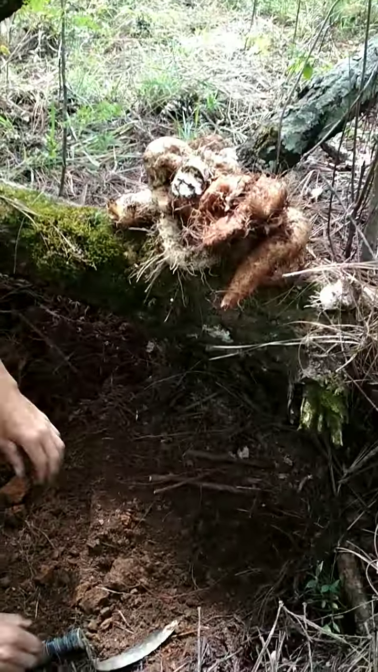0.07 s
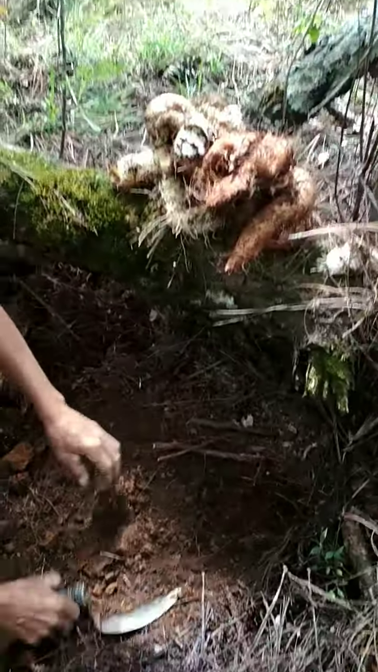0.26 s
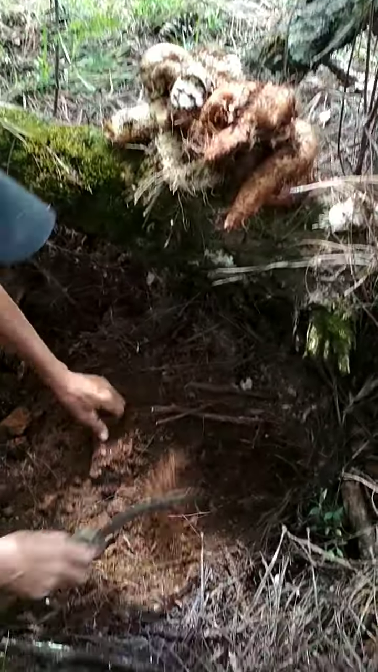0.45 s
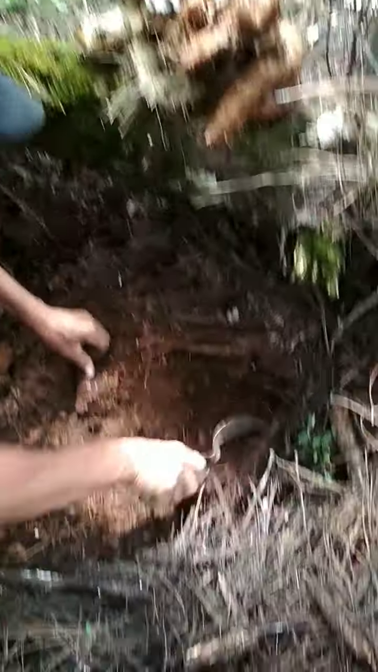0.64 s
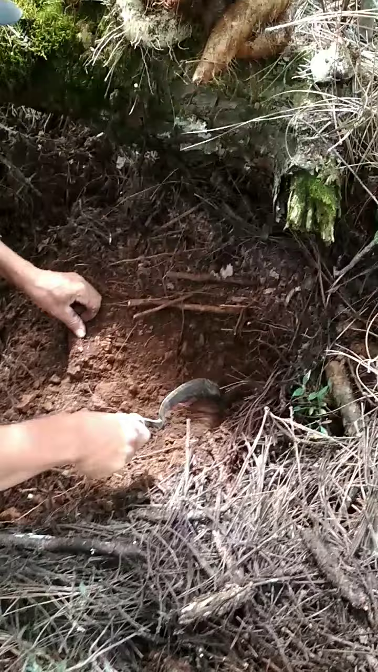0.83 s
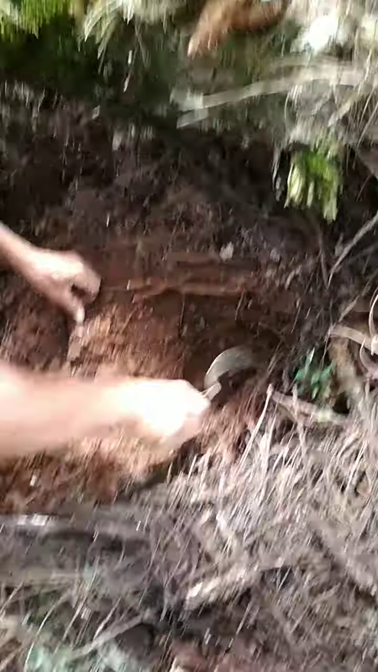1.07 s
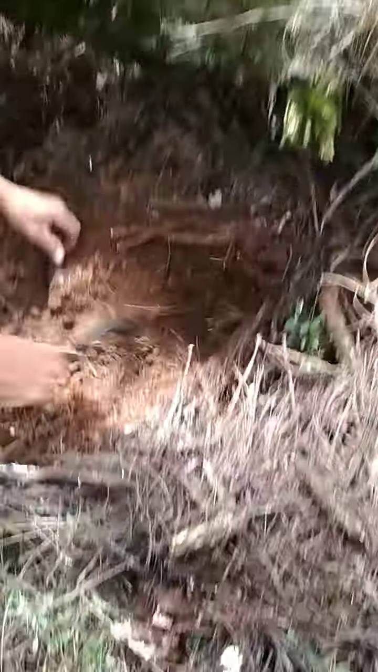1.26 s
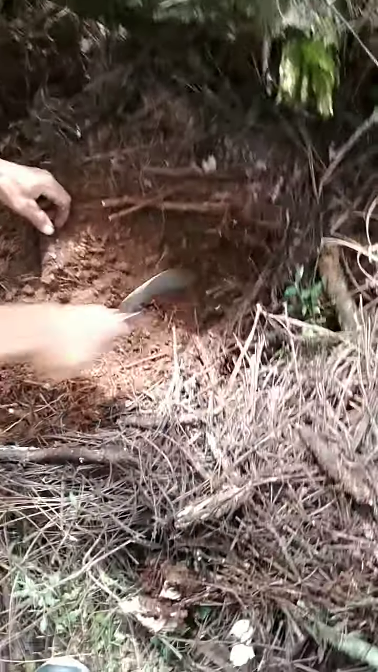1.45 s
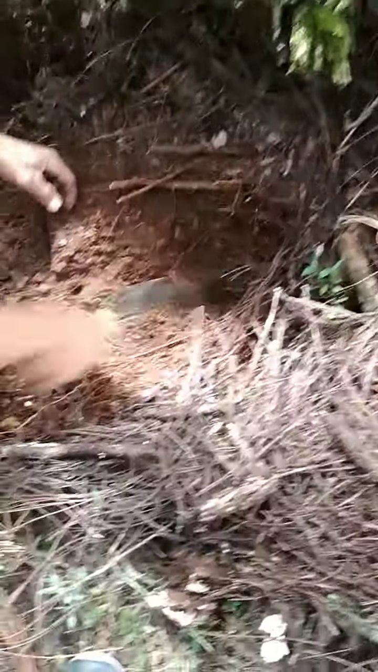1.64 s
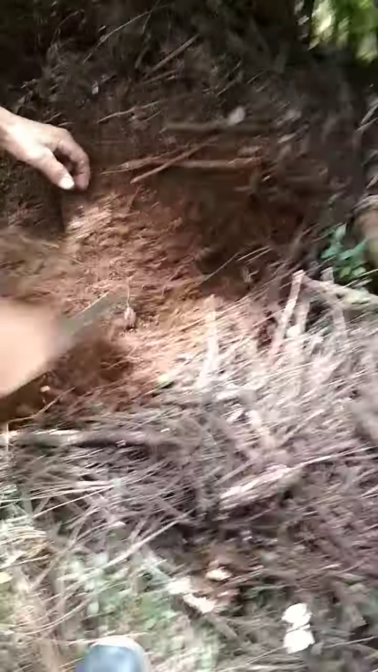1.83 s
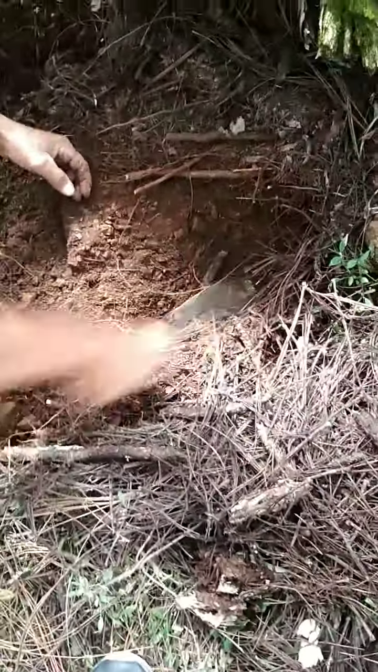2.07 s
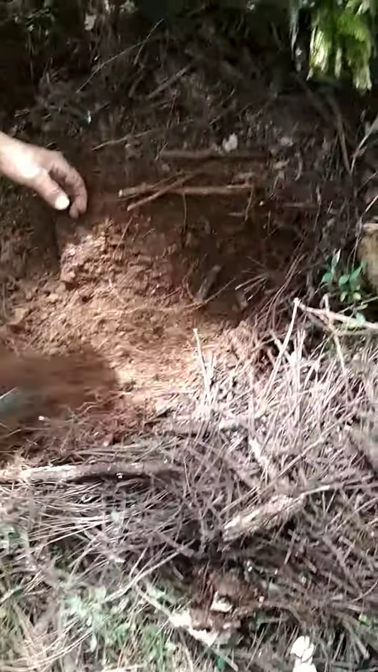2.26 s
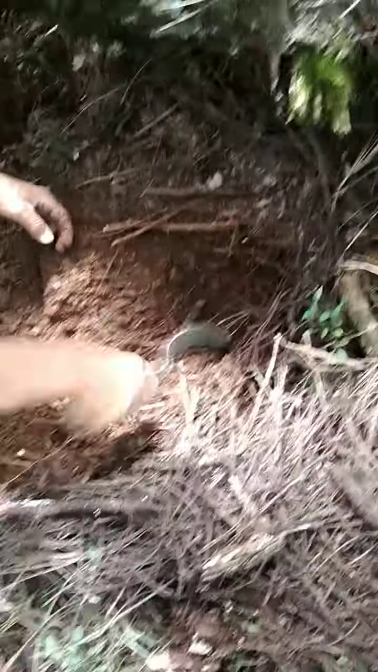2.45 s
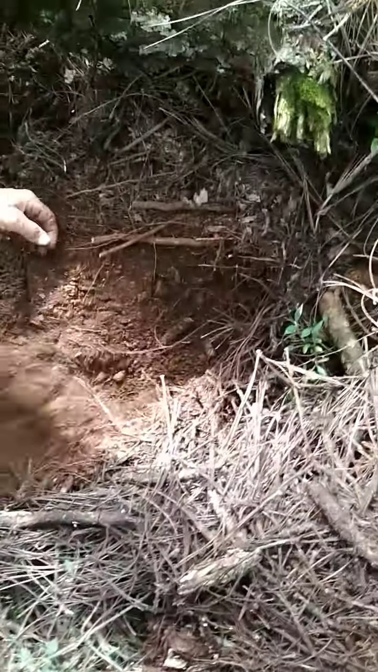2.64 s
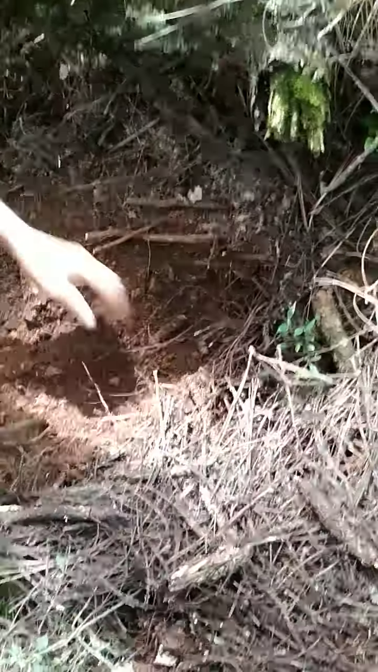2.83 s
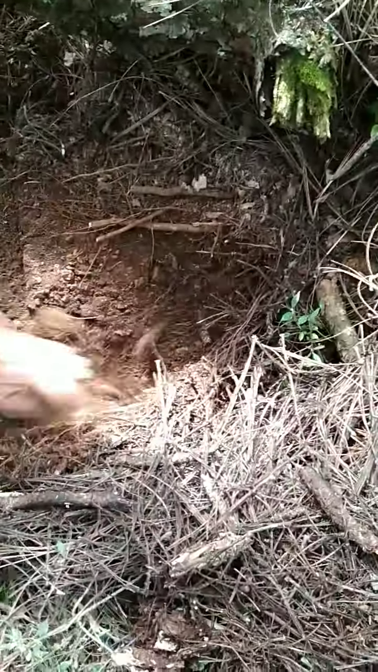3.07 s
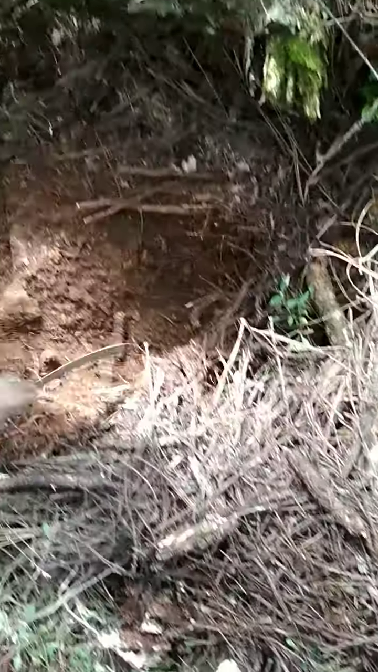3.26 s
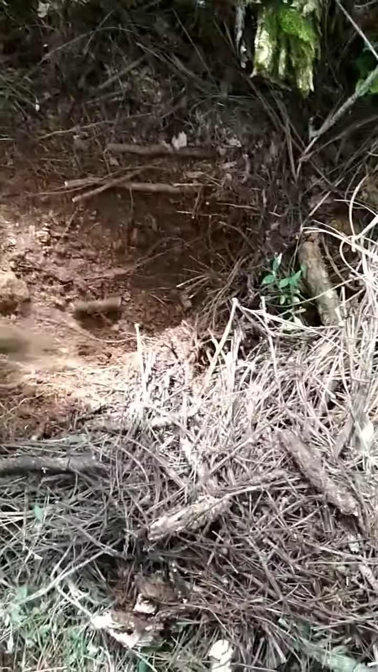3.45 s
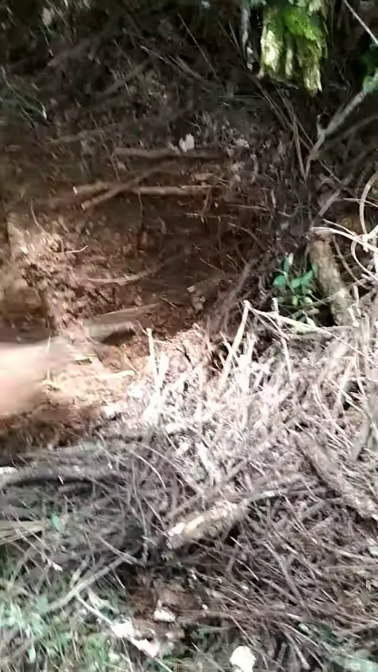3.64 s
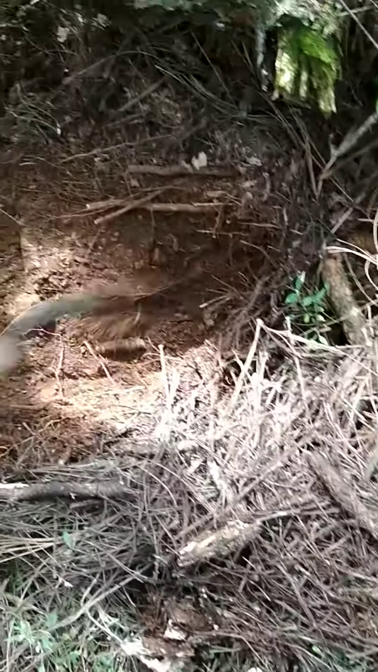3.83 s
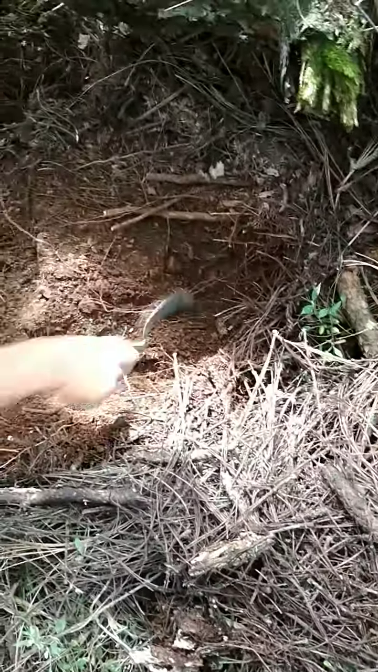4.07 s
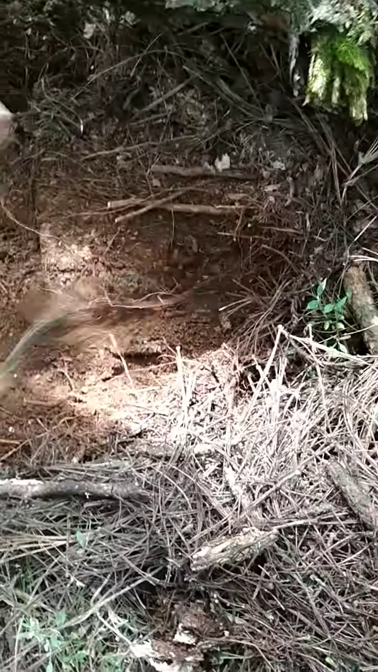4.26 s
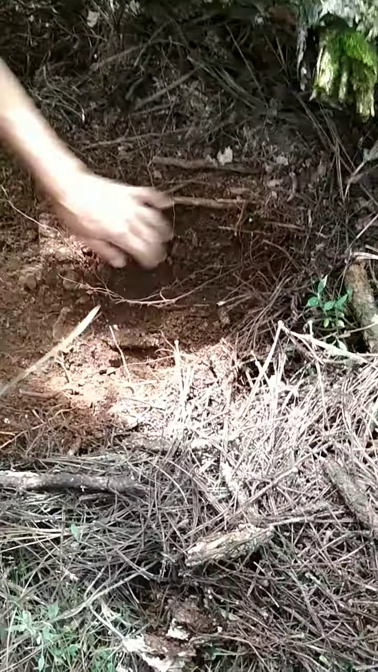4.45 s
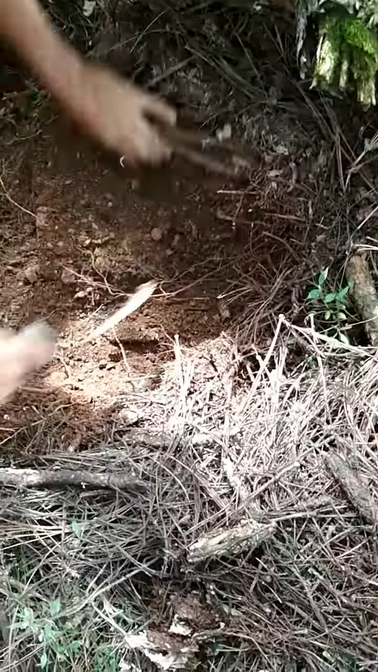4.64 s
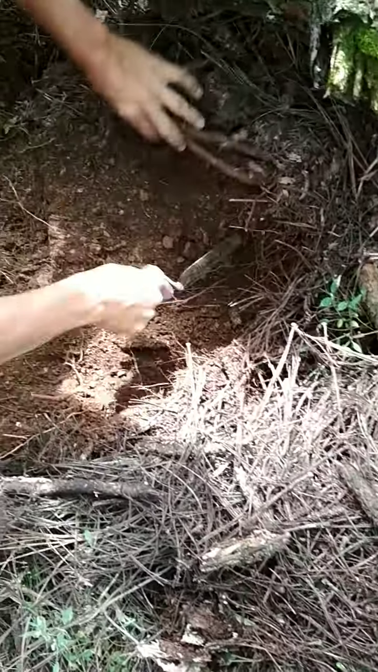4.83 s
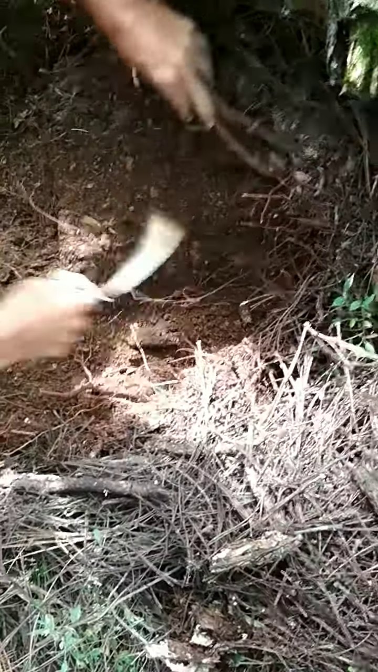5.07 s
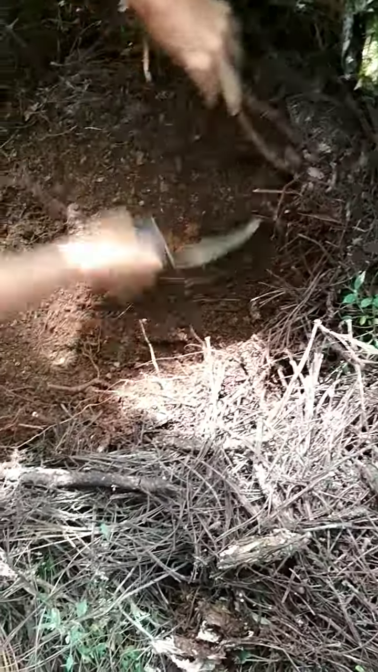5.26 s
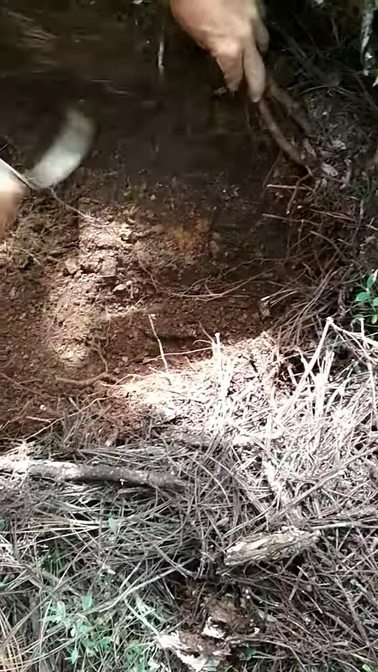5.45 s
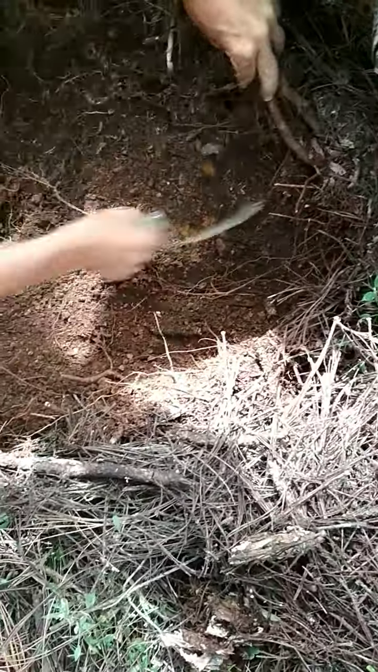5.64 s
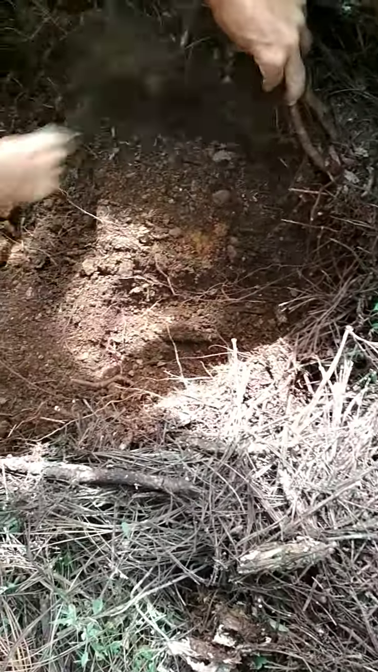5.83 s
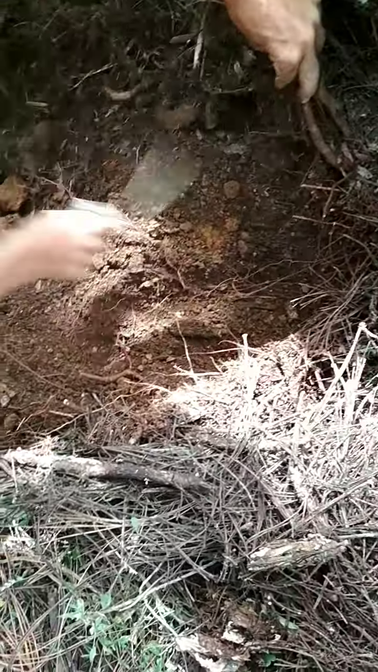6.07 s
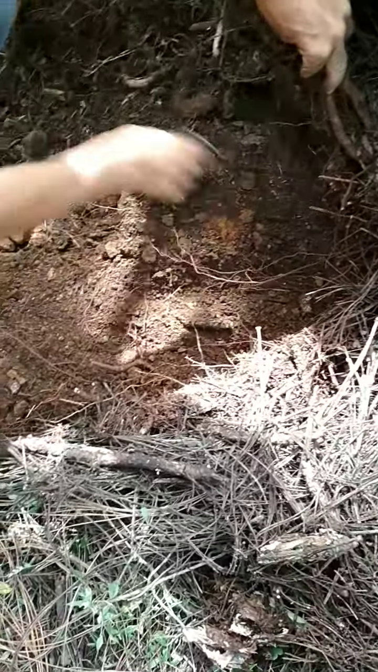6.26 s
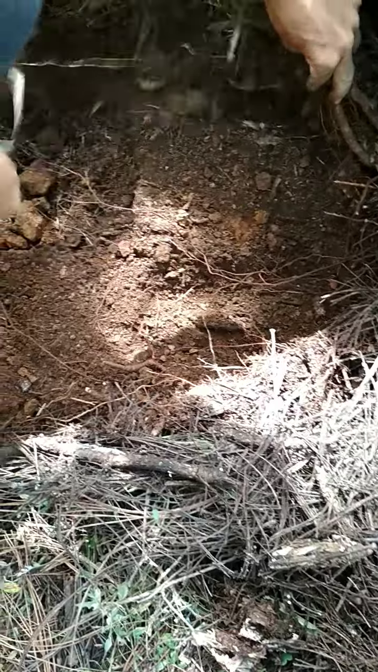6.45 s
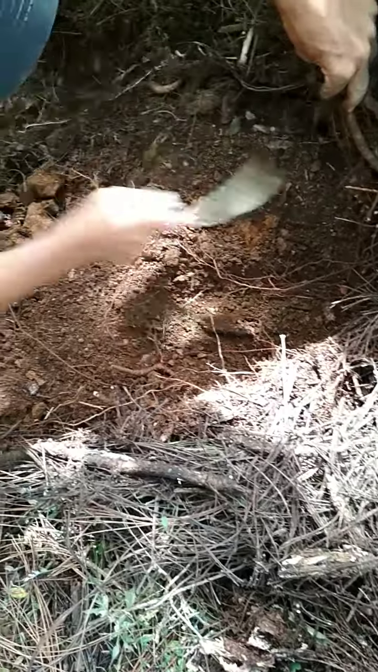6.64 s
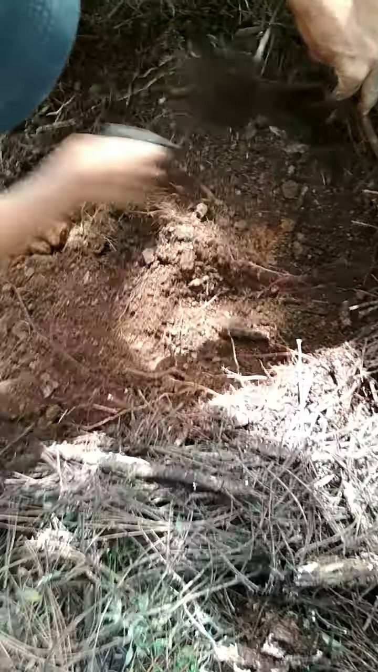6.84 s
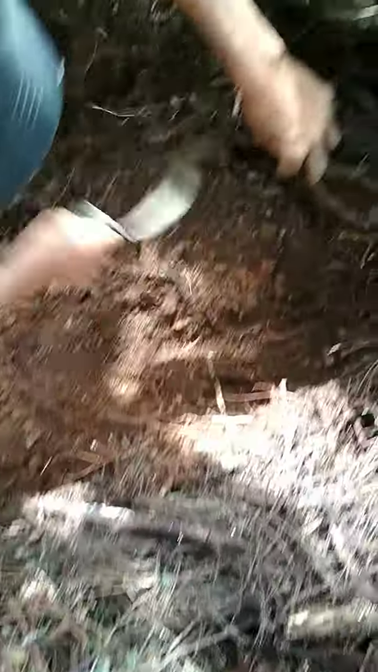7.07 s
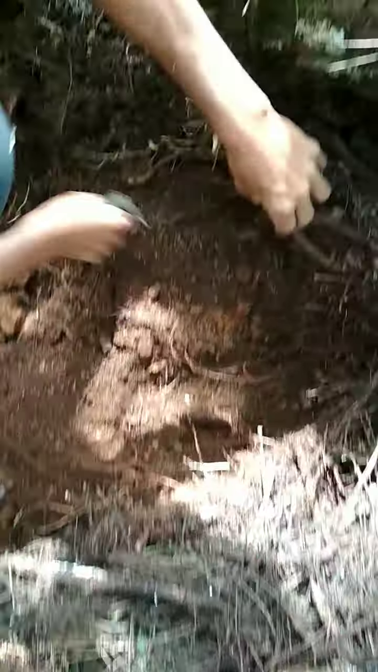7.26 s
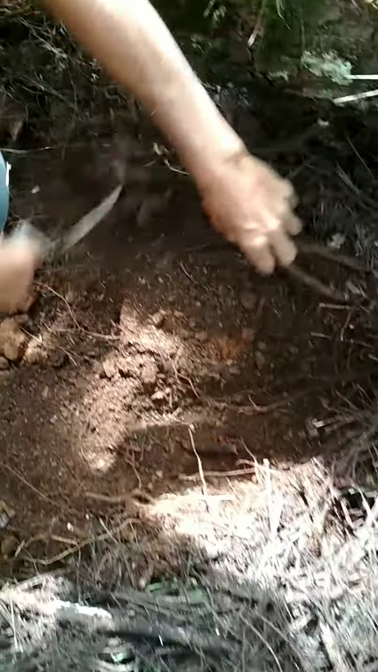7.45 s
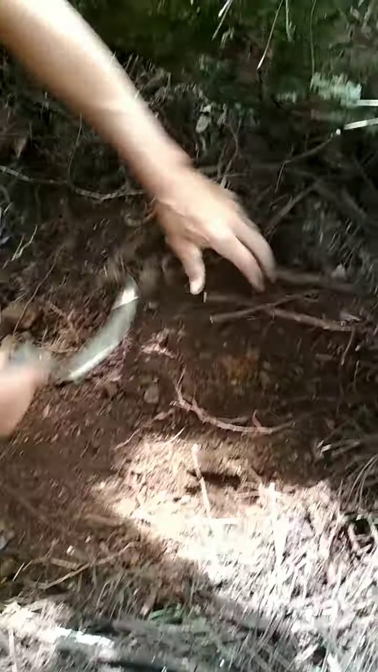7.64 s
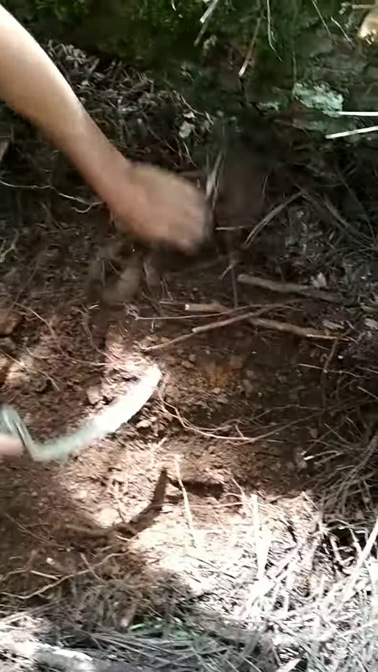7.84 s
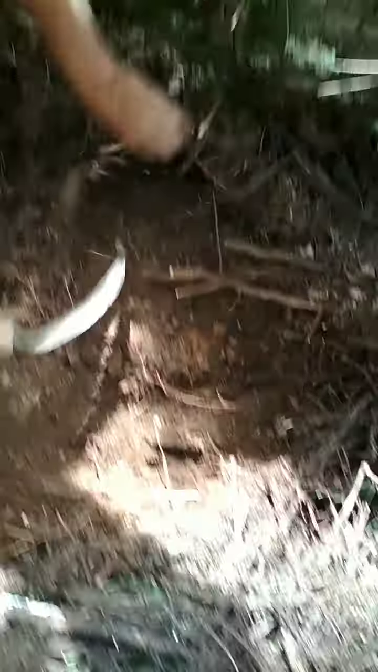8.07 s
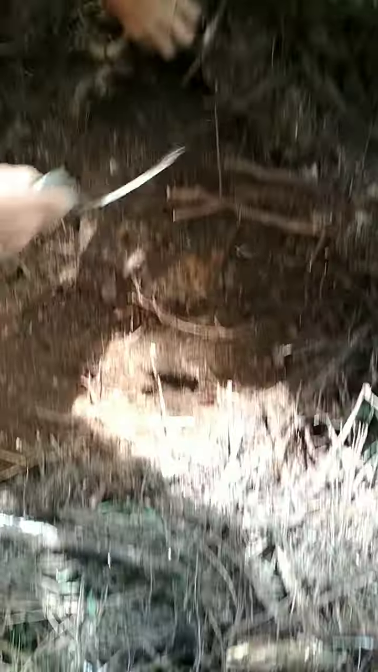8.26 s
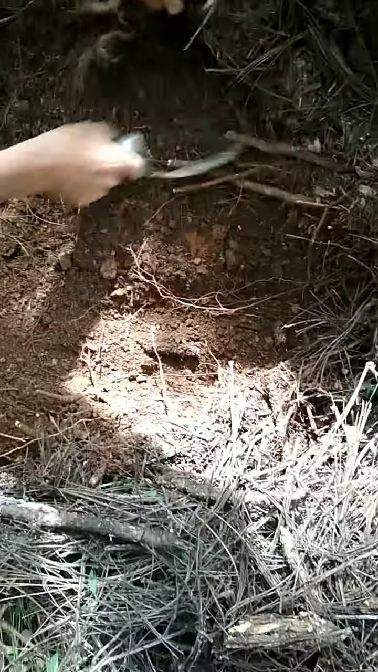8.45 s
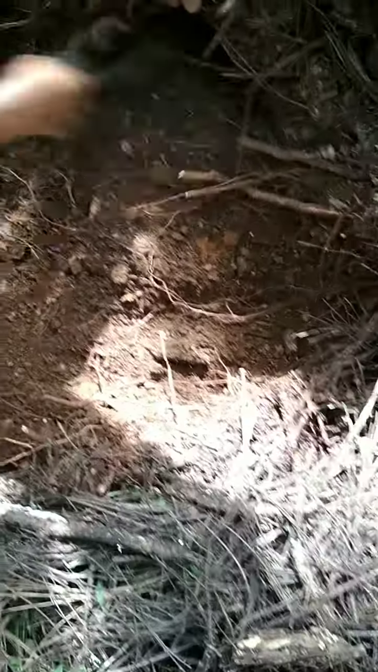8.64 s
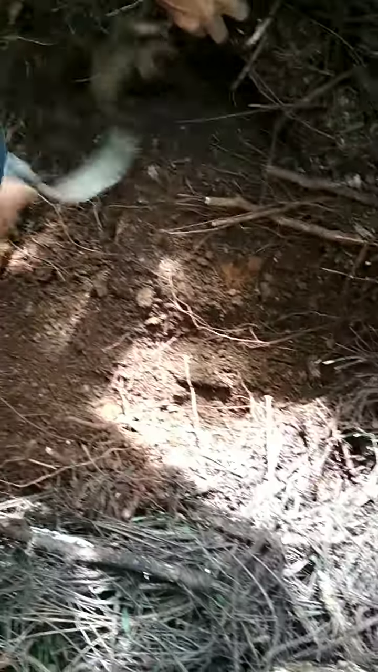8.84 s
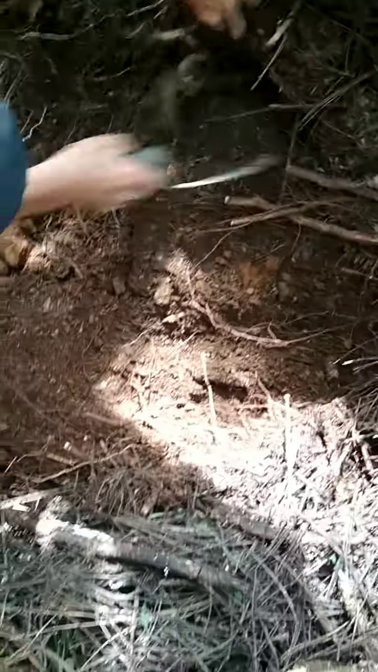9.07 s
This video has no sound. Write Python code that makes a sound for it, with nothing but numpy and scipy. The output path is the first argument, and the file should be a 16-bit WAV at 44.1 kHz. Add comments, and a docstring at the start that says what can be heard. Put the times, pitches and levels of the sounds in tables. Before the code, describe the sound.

Quiet woodland, with very faint tree hush, low rumble and a thin electronic whine. Light ticks and a small crack at 0.3-0.5 s, then a curved blade bites dry soil at 0.9 s and harder at 1.2-1.3 s, a bright gritty crunch with a dull thump. Rakes and chops follow at 1.7 and 2.0-2.7 s, ending in sharp cracks. A softer lull of brushing earth lasts to 3.4 s, then dense, strong crunching strokes at 3.4-3.6, 3.9 and 4.2-4.4 s. Gentle crumbling follows, with separate chops around 5.0, 5.4 and 5.8 s and tiny pebble pings on steel. The fullest dig comes at 6.3-6.5 s with a low shudder, another at 6.9 s. Light scraping and trickling crumbs fill 7-8.4 s, with a brief snap near 7.95. A last knocking scrape lands at 8.5-8.75 s, then crumbs settle until about 9.1 s. Close, dry, drifting right.

```python
"""A low rumble, the hush of the trees and the thin whine of a phone's electronics are heard first.
Then a curved steel blade chops and rakes dry, stony soil and twigs on a wooded slope, close by.
Filtered grains make the clumped crunch of grit and earth; damped sine pushes thump the ground.
Resonances set the steel singing faintly under the grit, and pebbles make it ring.
Crumbs trickle between strokes, and the slope scatters a short echo."""
import sys
import numpy as np
from scipy import signal
from scipy.fft import rfft, irfft, next_fast_len
from scipy.io import wavfile
from scipy.ndimage import uniform_filter1d, map_coordinates

SR = 44100
rng = np.random.default_rng(int(sys.argv[2]) if len(sys.argv) > 2 else 0)


def unload_wav(signal):
    """Save mono or channel-first audio to the path in sys.argv[1] as 16-bit WAV at rate SR, clipped to [-1, 1]."""
    wavfile.write(
        sys.argv[1],
        SR,
        np.round(np.clip(np.atleast_2d(signal).T, -1, 1) * 32767).astype(np.int16),
    )


N = 401310

# All levels below are relative: the functions trim them into the mix.
# Low rumble over time: (time [s], level [dB])
RUMBLE_LEVEL = [(0, -79.5), (6.24, -81), (6.33, -57.5), (6.4, -56), (6.51, -65), (7.0, -67.5), (7.88, -81),
                (8.01, -64.5), (8.51, -68.5), (8.59, -58), (9.1, -76)]
# Colour of the rumble: (frequency [Hz], density [dB per Hz])
RUMBLE_COLOUR = [(12, -41), (20, -7), (48, -8), (82, -2), (138, -12), (188, -25.5), (260, -46),
                 (340, -69.5), (570, -120)]
# Colour of the still forest: (frequency [Hz], density [dB per Hz])
FOREST_COLOUR = [(150, -6), (350, -2.5), (1000, -20), (1700, 4), (2600, -22), (6000, -23.5), (11000, -17.5),
                 (16000, -45)]
# Whine of the electronics, before the gain of each port: (frequency [Hz], level [dB])
WHINE_TONES = [(8000, -92.5), (9000, -99), (10000, -96), (12000, -99), (13000, -92), (14000, -111.5)]
# Port colour, left minus right: (frequency [Hz], difference [dB])
PORT_COLOUR = [(200, 0), (1500, -1), (4000, -0.5), (9000, -8), (14000, 2)]
# Phase by which the left port leads: (frequency [Hz], lead [rad])
PORT_PHASE_LEAD = [(250, -0.3), (900, -0.48), (1500, -0.62), (2600, 0.9)]
# Where the work lies as the phone turns: (time [s], left lag [s], left minus right [dB])
WORK_DIRECTION = [(0, 0.00003, 0.5), (1.8, .000035, -4), (2.9, 0.000054, -0.5), (4.5, 0.000035, -3),
                  (5.2, 0.00013, -4.5), (6.3, 0.00014, -5), (7, 0.00015, -5.5), (9.1, 0.00025, -6)]
# Crumbs and needles settling between strokes: (time [s], grit level [dB], earth level [dB])
SETTLING_CRUMBS = [(0, -93, -92), (1.1, -81, -74.5), (1.45, -70, -88), (1.95, -72.5, -80),
                   (2.35, -58.5, -68), (2.55, -74, -72), (3.05, -86, -81), (3.15, -69.5, -74.5),
                   (3.7, -81, -78), (4.65, -64, -69.5), (4.76, -74, -92), (4.85, -79, -108),
                   (5.25, -62.5, -63.5), (6.0, -71.5, -90.5), (6.75, -74, -76), (7.1, -65.5, -67),
                   (7.87, -102.5, -96), (7.99, -60, -78), (8.5, -71.5, -95), (8.8, -60.5, -59.5),
                   (9.02, -80, -89.5), (9.1, -70.5, -67.5)]
# Pushes and drags of blade or hand through soil: (full force [s], rise [s], hold [s], fall [s],
# grit level [dB], earth level [dB], deep earth level [dB])
SOIL_SCRAPES = [(0.025, .1, 0.034, 0.19, -100, -92.5, -72.5), (.4, 0.02, 0, 0.22, -81, -67, -99),
                (0.447, 0.13, 0.0051, 0.13, -60, -72, -97), (.53, 0.045, 0, 0.096, -67.5, -60, -88),
                (0.74, 0.23, 0.013, 0.06, -67, -75, -93), (0.882, 0.068, 0.0063, 0.046, -43.5, -51.5, -74),
                (0.968, 0.07, 0.012, 0.13, -67, -57.5, -68),
                (1.191, 0.051, 0.0067, 0.032, -48.5, -55.5, -56),
                (1.288, 0.056, 0.00073, 0.1, -31.5, -40.5, -39.5),
                (1.632, 0.08, 0.0036, 0.093, -60, -55.5, -55),
                (1.695, 0.033, 0.017, 0.14, -40.5, -46, -55.5), (1.838, 0.09, 0.015, 0.091, -57, -70, -86),
                (2.0, 0.038, 0.011, 0.15, -61.5, -51.5, -63), (2.08, 0.08, 0.0015, .06, -72, -65, -48.5),
                (2.16, 0.099, .02, 0.067, -35, -45.5, -53), (2.245, 0.072, 0.018, 0.042, -32, -42.5, -46.5),
                (2.429, 0.044, 0, .07, -57, -44, -47), (2.57, 0.32, 0.034, 0.11, -84, -60.5, -53.5),
                (2.66, 0.077, 0.025, 0.076, -32.5, -42, -51.5), (2.859, 0.29, 0, 0.17, -60.5, -61, -66.5),
                (3.01, .03, 0.028, .1, -94, -81, -67), (3.535, 0.17, 0.022, 0.056, -35, -37.5, -41.5),
                (3.67, 0.57, 0, 0.59, -61.5, -53, -57.5), (3.879, 0.063, 0.00095, 0.097, -41.5, -41, -46.5),
                (3.973, 0.11, 0.013, .05, -57, -47, -52.5), (4.08, 0.2, 0, 0.13, -60.5, -64, -77),
                (4.181, 0.022, 0.0073, 0.12, -66, -65, -52.5),
                (4.312, 0.14, 0.019, 0.055, -37.5, -43.5, -53),
                (4.46, 0.14, 0.059, 0.23, -71, -57.5, -63.5),
                (4.911, 0.038, 0.0035, 0.034, -68, -50, -56.5), (5.018, .15, 0.044, .15, -50, -57.5, -55.5),
                (5.12, 0.35, 0, 0.037, -73, -45.5, -57), (5.32, 0.05, 0.028, 0.25, -79, -62, -58),
                (5.42, 0.047, 0, 0.13, -46.5, -50, -49.5), (5.58, 0.095, 0.0013, 0.14, -57, -65, -91),
                (5.83, 0.06, 0, 0.076, -44.5, -46.5, -50.5), (5.9, 0.29, 0, 0.32, -50.5, -54, -60),
                (6.16, 0.096, 0.0008, 0.088, -56.5, -64, -95), (6.347, 0.073, 0.048, 0.18, -36, -40, -43),
                (6.696, 0.086, 0, 0.093, -80, -67.5, -82), (6.905, 0.095, 0.0045, 0.17, -44.5, -48, -47),
                (6.999, 0.068, 0, .04, -64, -47.5, -62), (7.15, 0.041, 0.0015, 0.072, -69, -59, -70),
                (7.387, 0.052, 0.024, 0.31, -56.5, -59.5, -70), (7.7, 0.2, 0.014, 0.15, -64, -72, -85),
                (7.96, 0.12, 0.0086, 0.1, -56, -80.5, -100), (8.46, .3, 0.0027, 0.18, -65, -60, -95),
                (8.56, 0.11, 0.047, 0.15, -61, -59.5, -72), (8.662, 0.11, 0.082, 0.032, -38, -45.5, -55),
                (8.83, 0.089, 0.0012, .1, -59, -61, -63)]
# Blade, roots and clods knocking the ground: (time [s], peak [dB], pitch of first contact [Hz])
GROUND_KNOCKS = [(0.286, -58.5, 880), (0.393, -37, 1890), (0.522, -45, 1710), (0.702, -55.5, 1020),
                 (0.875, -35, 1840), (0.966, -44.5, 1600), (1.08, -47, 1290), (1.181, -36.5, 1560),
                 (1.248, -33.5, 930), (1.282, -28, 596), (1.32, -29.5, 1980), (1.573, -43.5, 1380),
                 (1.633, -37.5, 755), (1.7, -36.5, 540), (1.97, -44, 1860), (1.99, -40, 1250),
                 (2.013, -34, 770), (2.07, -27.5, 830), (2.165, -35.5, 500), (2.228, -38, 830),
                 (2.245, -29.5, 1780), (2.332, -45, 730), (2.4, -38, 346), (2.419, -30, 233),
                 (2.4195, -36.5, 1200), (2.46, -35.5, 310), (2.527, -39, 740), (2.569, -34, 2030),
                 (2.628, -37, 2220), (2.645, -34, 2240), (2.679, -26.5, 2280), (3.008, -49.5, 337),
                 (3.329, -50.5, 269), (3.401, -37, 1720), (3.459, -28, 1370), (3.517, -25, 1780),
                 (3.56, -31, 1220), (3.587, -29.5, 1240), (3.649, -42, 276), (3.708, -39, 746),
                 (3.799, -43, 800), (3.869, -40, 1390), (3.968, -27, 1800), (4.072, -39, 1350),
                 (4.176, -37, 1556), (4.225, -33.5, 1380), (4.278, -29, 2200), (4.308, -22.5, 1900),
                 (4.366, -25, 1540), (4.463, -42, 617), (4.822, -47.5, 1460), (4.881, -44.5, 990),
                 (4.911, -37, 820), (5.095, -31, 1640), (5.185, -43, 1950), (5.315, -32, 1200),
                 (5.361, -30, 1250), (5.418, -30.5, 1130), (5.815, -25.5, 1350), (5.95, -41.5, 795),
                 (6.022, -40.5, 1250), (6.315, -28.5, 1290), (6.342, -29, 1290), (6.358, -22, 1570),
                 (6.406, -32, 1820), (6.672, -51, 810), (6.8, -32.5, 1200), (6.828, -39, 840),
                 (6.854, -40, 1140), (6.873, -21, 1550), (6.91, -25.5, 1770), (6.982, -29, 1170),
                 (7.143, -39.5, 1320), (7.468, -51, 1200), (7.588, -57, 804), (7.674, -49, 1050),
                 (8.447, -40, 1210), (8.582, -40.5, 850), (8.612, -36, 515), (8.635, -30, 1560),
                 (8.742, -25.5, 630)]
# Pebbles on the lifted blade: (time [s], peak [dB])
PEBBLE_PINGS = [(0.9629, -35.5), (1.3447, -47), (1.531, -46), (2.7023, -41.5), (3.5585, -38),
                (4.038, -43.5), (5.443, -39.5), (5.5658, -43), (6.1474, -51), (6.257, -42), (6.4842, -32.5)]
# Modes of the blade hanging free: (frequency [Hz], level [dB], t60 [s])
STEEL_MODES = [(4000, -12.5, 0.13), (5270, -11.5, 0.057), (6640, -16, .15), (7800, -13.5, .26),
               (8280, -6.5, 0.31), (9600, -14, 0.28), (9610, -4, 0.25), (10040, -6.5, 0.13),
               (11000, -2, 0.4), (11600, -2.5, 0.17), (12840, -2, 0.071), (15000, -12, 0.054),
               (15000, -7, .12)]
# Sharp bursts of grit: (time [s], peak [dB], t60 [s])
GRIT_CRACKS = [(0.2723, -54.5, 0.025), (0.3923, -27.5, 0.012), (0.5256, -41, 0.011), (0.7433, -40.5, 0.018),
               (0.8558, -39, 0.041), (0.8735, -26.5, 0.033), (0.9629, -44, 0.046), (1.1577, -39.5, 0.044),
               (1.1814, -34, 0.024), (1.2474, -14.5, 0.019), (1.2759, -21, 0.026), (1.2884, -20, 0.018),
               (1.3472, -22, 0.0082), (1.5333, -41, 0.0089), (1.629, -29.5, 0.017), (1.7017, -32.5, 0.079),
               (1.7394, -19, 0.013), (1.7889, -27.5, 0.023), (2.0696, -25, 0.017), (2.1404, -29, 0.026),
               (2.2412, -29, 0.014), (2.3663, -38, 0.01), (2.525, -28.5, 0.017), (2.5692, -13.5, 0.026),
               (2.6283, -28, 0.018), (2.6812, -23, 0.025), (2.7005, -14, 0.013), (3.3994, -21.5, 0.022),
               (3.4445, -33, 0.088), (3.4634, -26, 0.056), (3.5202, -17.5, 0.023), (3.534, -21, 0.024),
               (3.559, -19.5, 0.019), (3.854, -26, 0.038), (3.869, -13.5, 0.022), (3.9035, -33, 0.057),
               (3.962, -14.5, 0.021), (4.1751, -33.5, 0.059), (4.2244, -21, 0.036), (4.2461, -22, 0.037),
               (4.2773, -30.5, 0.062), (4.3, -13, 0.014), (4.9021, -36, 0.031), (4.9539, -32, 0.013),
               (4.9784, -25.5, 0.017), (5.0134, -31, 0.02), (5.2328, -42, 0.018), (5.3122, -38, 0.04),
               (5.3606, -26.5, 0.043), (5.4155, -16.5, 0.02), (5.4454, -44, 0.038), (5.7808, -23.5, 0.015),
               (5.8136, -29.5, 0.021), (5.829, -29, 0.035), (5.9003, -34.5, 0.033), (6.2586, -39.5, 0.059),
               (6.3155, -22.5, 0.026), (6.3374, -25.5, 0.038), (6.352, -25.5, 0.027), (6.3804, -13, 0.011),
               (6.4013, -26, 0.041), (6.4527, -35, 0.02), (6.5369, -37.5, 0.019), (6.8007, -40, 0.1),
               (6.8716, -17, 0.025), (6.9051, -16, 0.021), (6.933, -31, 0.055), (7.377, -36, 0.02),
               (7.6509, -44, 0.024), (7.9478, -23, 0.011), (8.1832, -40.5, 0.026), (8.4097, -35.5, 0.018),
               (8.489, -44, 0.072), (8.5494, -26, 0.014), (8.6122, -36, 0.036), (8.6333, -38, 0.011),
               (8.6546, -23, 0.009), (9.0502, -44, 0.03)]
# Colour of crushed grit: (frequency [Hz], density [dB per Hz])
GRIT_COLOUR = [(3530, -43), (6000, -11), (9710, -2), (12800, -4), (13900, -4), (14600, -1.5),
               (15500, -12.5), (16000, -28), (16300, -42.5)]
# Colour of fine dust: (frequency [Hz], density [dB per Hz])
DUST_COLOUR = [(3530, -16), (6000, -9.5), (9390, -1), (11400, -6.5), (11700, -9), (14500, -7.5),
               (16000, -22), (16300, -54)]
# Colour of coarse grit: (frequency [Hz], density [dB per Hz])
COARSE_COLOUR = [(1410, -6), (2400, -3), (4230, -4), (5010, 1), (5890, -7.5), (6600, -6.5), (8580, -32),
                 (14500, -120)]
# Colour of crumbling earth: (frequency [Hz], density [dB per Hz])
EARTH_COLOUR = [(280, -41), (480, -19), (556, -1), (1030, -4.5), (1180, 1), (1520, 2), (2760, -10.5),
                (3800, -24.5), (4940, -51), (8360, -120)]
# Colour of deep earth: (frequency [Hz], density [dB per Hz])
DEEP_COLOUR = [(65, -43), (110, -4), (253, -3), (286, 0.5), (428, -11.5), (520, -5.5), (680, -36),
               (1140, -120)]

FOREST_DB = -87.5
SHAKE_DB, SHAKE_S = -25, 0.065  # rumble added by deep digging, against the deep earth; its smoothing
TOP_HZ = 16400  # band limit
ECHO_DB = -6
EDGE_DB = 30  # how far the level climbs over a scrape's rise and drops over its fall
DEEP_UNDER_DB = -15.5  # deep earth against the settling earth
CRUMBS_RIGHT_DB = 1.5  # loose crumbs roll further to the right than the blade
RISE_SHARE = 0.066  # rise time constant of a crack over its t60
# small chance cracks: rate, peak base over the grit level, upward spread, decay
SLIPS_PER_S, SLIP_DB, SLIP_SPREAD_DB, SLIP_T60_S = 25, 4.5, 3.5, 0.019
# small chance knocks: rate, peak base over the earth level, upward spread, middle pitch, its deviation
KNOCKS_PER_S, KNOCK_DB, KNOCK_SPREAD_DB, KNOCK_HZ, KNOCK_OCTAVES = 40, 1, 4, 1016, 0.63


def amp(db):
    """Gain of a level in dB."""
    return 10 ** (np.asarray(db) / 20)


def unit(x):
    """Scaled to rms 1."""
    return x / np.sqrt(np.mean(x ** 2) + 1e-20)


def along(points, hz):
    """Read (frequency, value) points on a log frequency axis."""
    f, v = np.transpose(points)
    return np.interp(np.log(hz + 1), np.log(f + 1), v)


def curves(rows):
    """One value per sample for each column after the time."""
    s, *columns = np.transpose(rows)
    return [np.interp(np.arange(N) / SR, s, column) for column in columns]


def wobble(rate):
    """A smooth random curve, rate knots a second."""
    knots = rng.standard_normal(int(N * rate / SR) + 4)
    return map_coordinates(knots, [np.arange(N) * rate / SR])


def filtered(x, response):
    """Shape x by a complex response of frequency."""
    m = next_fast_len(N + SR // 2)
    return irfft(rfft(x, m) * response(np.fft.rfftfreq(m, 1 / SR)), m)[..., :N]


def coloured(x, spectrum):
    """Colour x by a table of densities, at rms 1."""
    return unit(filtered(x, lambda hz: amp(along(spectrum, hz))))


def by_chance(per_s, level_db, spread_db):
    """Random moments with a peak that follows a level, and one normal value each."""
    when, size, a, b = rng.random((int(per_s * N / SR), 4)).T
    peak_db = level_db[(when * N).astype(int)] - spread_db * np.log(1 - .9 * size)
    normal = np.sqrt(-2 * np.log(1 - a)) * np.cos(2 * np.pi * b)
    return when * (N - SR // 50) / SR, peak_db, normal


def grains(count, size_db, spread_s, spectrum, patchy_db, window):
    """Tiny impacts strewn over the ground, each with its own lag at the left port and patchy colour."""
    when, chance, place, sign = rng.random((count, 4)).T
    at = (when * N).astype(int)
    size = amp(-size_db * np.log(1 - .993 * chance)) * np.sign(sign - .5)
    lag_s = curves(WORK_DIRECTION)[0][at] + spread_s * (2 * place - 1)
    late = np.round(lag_s * SR).astype(int)
    pair = np.array([np.bincount(np.clip(at + d, 0, N - 1), size, N) for d in (late, 0)])
    z = signal.stft(pair, nperseg=window)[2]
    # neighbouring bins and frames share a random gain, so every clump has its colour
    field = uniform_filter1d(rng.standard_normal(z.shape[1:]), 3, 0)
    field = uniform_filter1d(field, 4, 1)
    pair = signal.istft(z * amp(patchy_db * unit(field)), nperseg=window)[1][:, :N]
    return coloured(pair, spectrum)


def background(deep_db):
    """A wavering low rumble, partly shared by both ports, over the hush of the trees."""
    shared, own = rng.standard_normal(N), rng.standard_normal((2, N))
    rumble = coloured(shared + .7 * own, RUMBLE_COLOUR)
    hush = coloured(rng.standard_normal((2, N)), FOREST_COLOUR)
    shake = uniform_filter1d(amp(deep_db + SHAKE_DB), round(SHAKE_S * SR))
    rumble_env = amp(curves(RUMBLE_LEVEL)[0] - 2.5) + shake
    return rumble_env * rumble + amp(FOREST_DB) * hush


def electronic_whine():
    """The phone's electronics whine in steady thin tones whose levels waver."""
    t = np.arange(N) / SR
    return sum(np.sqrt(2) * amp(db + 2.6 * wobble(12)) * np.sin(2 * np.pi * hz * t)
               for hz, db in WHINE_TONES)


def ground_echo(x):
    """The rough slope scatters a short, diffuse echo, unlike at each port."""
    t, out = np.arange(SR // 20) / SR, np.zeros((2, N + SR))
    step = SR // 4  # the scatter is drawn afresh every quarter second
    for i in range(0, N, step):
        tail = rng.standard_normal((2, len(t))) * amp(-60 * t / 0.044)
        echo = signal.fftconvolve(x[:, i:i + step], tail / np.linalg.norm(tail[0]), axes=1)
        out[:, i + SR // 1500:][:, :echo.shape[1]] += echo
    return out[:, :N]


def digging_levels():
    """Grit, earth and deep earth in dB: every scrape rises, holds and falls over the settling crumbs."""
    t = np.arange(0, N / SR + .002, .001)
    s, rise, hold, fall, *peaks = np.transpose(SOIL_SCRAPES)[:, :, None]
    before = np.maximum(s - t, 0) / np.maximum(rise, .01)
    after = np.maximum(t - s - hold, 0) / np.maximum(fall, .01)
    shape_db = -EDGE_DB * (before + after)
    powers = [np.sum(amp(db + shape_db) ** 2, axis=0) for db in peaks]
    scraped = [np.interp(np.arange(N) / SR, t, power) for power in powers]
    grit_db, earth_db = curves(SETTLING_CRUMBS)
    settling = (grit_db, earth_db, earth_db + DEEP_UNDER_DB)
    return [10 * np.log10(power + amp(db) ** 2) for power, db in zip(scraped, settling)]


def thumps(earth_db):
    """Dead earth gives a few fast-dying cycles; the clod rebounds and crumbles within some 10 ms."""
    out, t, lag = np.zeros((2, N + SR)), np.arange(SR // 20) / SR, curves(WORK_DIRECTION)[0]
    when, peak_db, tone = by_chance(KNOCKS_PER_S, earth_db + KNOCK_DB, KNOCK_SPREAD_DB)
    knocks = GROUND_KNOCKS + list(zip(when, peak_db, KNOCK_HZ * 2 ** (KNOCK_OCTAVES * tone)))
    for (s, db, hz), contacts in zip(knocks, rng.random((len(knocks), 4, 3))):
        for k, (wait, pitch, size) in enumerate(contacts):
            i = round((s + k * .0022 * (.5 + wait)) * SR)
            # the first contact keeps its pitch, the rebounds stray from it
            cycles = t * hz * 2 ** ((pitch - .5) * 1.3 * min(k, 1))
            env = amp(db + 1.5 - k * (1.5 + 9.6 * size) - 6.2 * cycles)
            push = env * np.sin(2 * np.pi * cycles) * (1 - np.exp(-6 * cycles))
            out[0, i + round(lag[i] * SR):][:len(t)] += push
            out[1, i:][:len(t)] += push
    return out[:, :N]


def steel_response(f):
    """Buried in soil the steel's modes are damped: each is a broad resonance."""
    total = 0
    for centre, db, t60 in STEEL_MODES:
        width = np.log(1000) / (np.pi * max(0.12 * t60, .01))  # Hz, from the shortened decay
        total = total + amp(db) * 1j * f * width / (centre * centre - f * f + 1j * f * width)
    return total


def blade(grit):
    """Grit drives the buried blade; lifted, it rings on after a pebble strikes."""
    free, t = np.zeros(N + SR), np.arange(SR // 2) / SR
    for s, peak_db in PEBBLE_PINGS:
        ring = sum(amp(db + rng.normal(0, 3.5) - 60 * t / t60) * np.sin(2 * np.pi * hz * t)
                   for hz, db, t60 in STEEL_MODES)
        free[round(s * SR):][:len(t)] += amp(peak_db - 22.0) * ring
    return amp(-1.0) * filtered(grit, steel_response) + free[:N]


def bursts(rows):
    """Envelope of sudden releases: a quick rise, then an ever steeper fall."""
    env, t = np.zeros(N + SR), np.arange(SR // 8) / SR
    for s, db, t60 in rows:
        t60 = max(t60, .004)
        rise = (1 - np.exp(-t / (RISE_SHARE * t60))) ** 2
        env[round(s * SR):][:len(t)] += amp(db - 60 * (t / t60) ** 1.5) * rise
    return env[:N]


def soil(grit_db, earth_db, deep_db):
    """The edge jams and frees: grit and earth break in shared, short clumps; returns both layers."""
    s, db, _ = by_chance(SLIPS_PER_S, grit_db + SLIP_DB, SLIP_SPREAD_DB)
    slips = [(a, b, SLIP_T60_S) for a, b in zip(s, db)]
    cracks = amp(-10.0) * bursts(GRIT_CRACKS + slips)
    clumps_db = 1.2 * wobble(45) + 3 * wobble(150)
    force = np.clip((grit_db + 70) / 16, 0, 1)  # 0 while crumbs only trickle, 1 under the blade
    pan_db = curves(WORK_DIRECTION)[1] - CRUMBS_RIGHT_DB * (1 - force)

    grit_env = amp(grit_db) * np.sqrt(force) * unit(amp(clumps_db)) + cracks
    dust_env = amp(grit_db + 1.6 * wobble(48)) * np.sqrt(1 - force)
    coarse_db = 0.62 * grit_db + 0.33 * earth_db - 11 + 2.7 * force
    coarse_env = amp(coarse_db) * unit(amp(clumps_db + 1.5 * wobble(60))) + amp(-11.5) * cracks
    earth_clumps = unit(amp(0.42 * clumps_db + 3.5 * wobble(90)))
    earth_env = amp(earth_db - 3.5) * earth_clumps + amp(-13.5) * cracks
    deep_env = amp(deep_db + 3.0 * wobble(30) - 2.0)

    grit = grit_env * grains(count=140000, size_db=5.0, spread_s=0.00015, spectrum=GRIT_COLOUR,
                             patchy_db=3.5, window=256)
    grit += dust_env * grains(count=90000, size_db=3.5, spread_s=0.00027, spectrum=DUST_COLOUR,
                              patchy_db=5, window=256)
    grit += coarse_env * grains(count=60000, size_db=1.5, spread_s=0.00014, spectrum=COARSE_COLOUR,
                                patchy_db=3.0, window=256)
    earth = earth_env * grains(count=40000, size_db=1.0, spread_s=0.00016, spectrum=EARTH_COLOUR,
                               patchy_db=6.0, window=512)
    deep = deep_env * grains(count=9000, size_db=2.5, spread_s=0.00037, spectrum=DEEP_COLOUR,
                             patchy_db=5.0, window=256)
    return grit * amp([pan_db / 2 - 2.5, -pan_db / 2 - 3.5]), earth + deep


def scene():
    """Digging, its echo and the woods; small clods radiate no deep bass."""
    grit_db, earth_db, deep_db = digging_levels()
    grit, earth = soil(grit_db, earth_db, deep_db)
    digging = grit + blade(grit) + earth + thumps(earth_db)
    digging = filtered(digging, lambda hz: (1j * hz / (120 + 1j * hz)) ** 3)
    echo = filtered(ground_echo(digging), lambda hz: (1j * hz / (500 + 1j * hz)) ** 2)
    return digging + amp(ECHO_DB) * echo + background(deep_db)


def port_response(hz):
    """Two unlike ports: half the colour each way, and a phase lead on the left."""
    colour_db = along(PORT_COLOUR, hz) / 2
    return amp([colour_db, -colour_db]) * np.exp([1j * along(PORT_PHASE_LEAD, hz), 0 * hz])


def record(dry):
    """Colour the two ports, add the whine, strongest on the right, and cut all above the band limit."""
    whine = electronic_whine() * amp([[-22], [5]])
    return filtered(filtered(dry, port_response) + whine, lambda hz: hz < TOP_HZ)


dry = scene()
out = record(dry)
unload_wav(out)
```